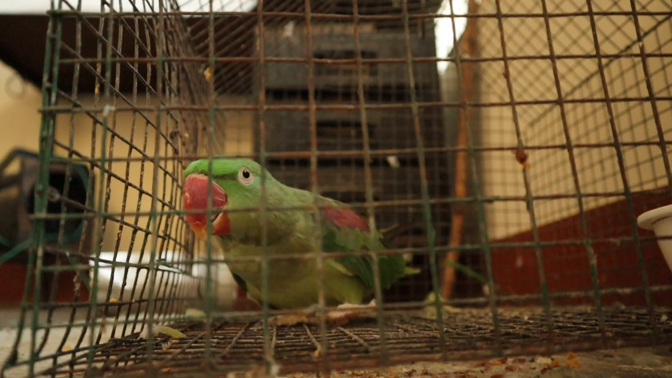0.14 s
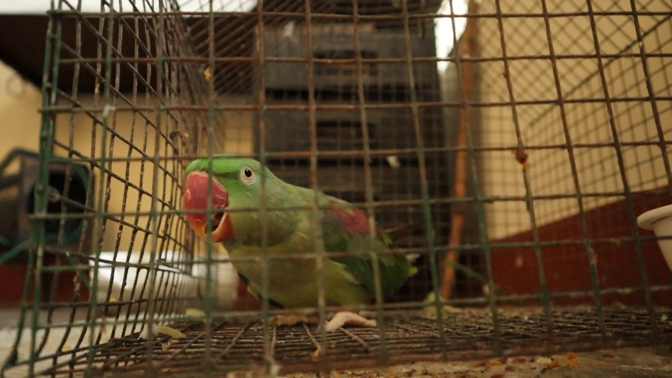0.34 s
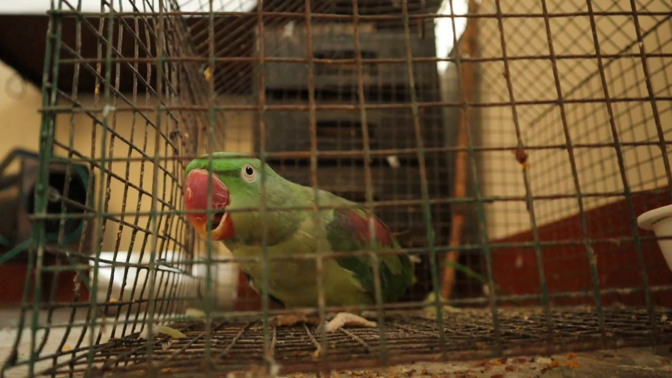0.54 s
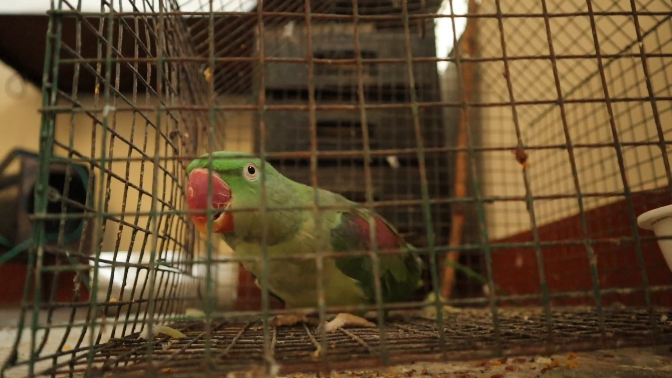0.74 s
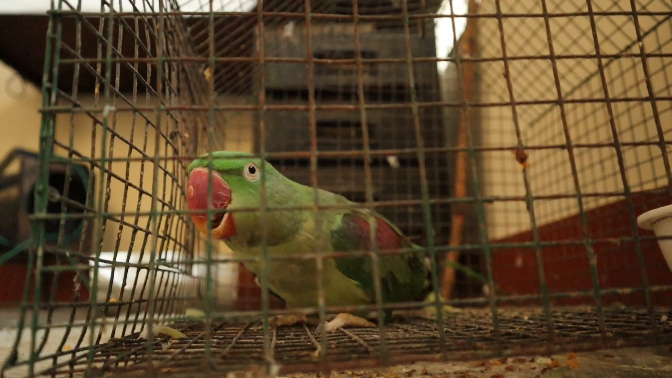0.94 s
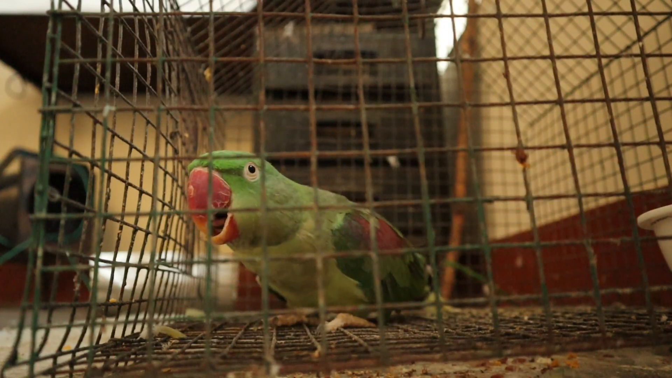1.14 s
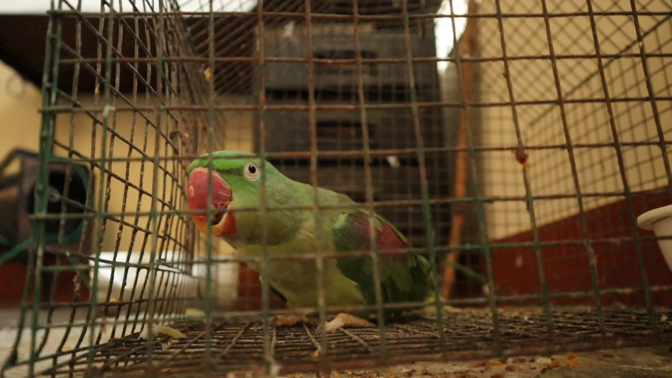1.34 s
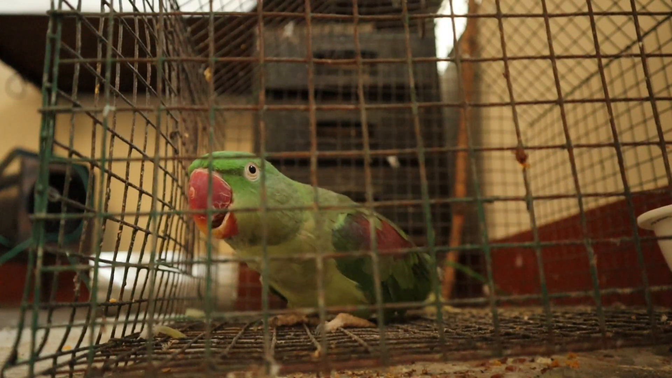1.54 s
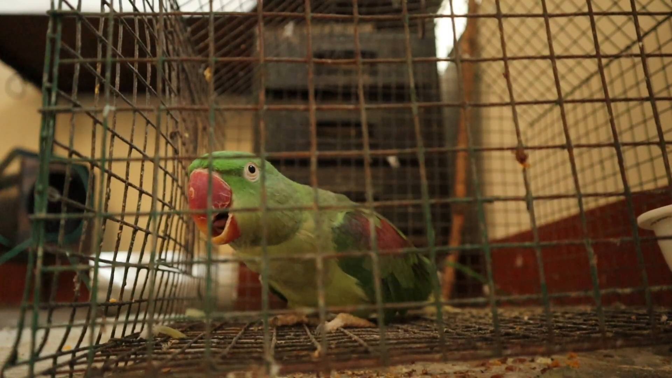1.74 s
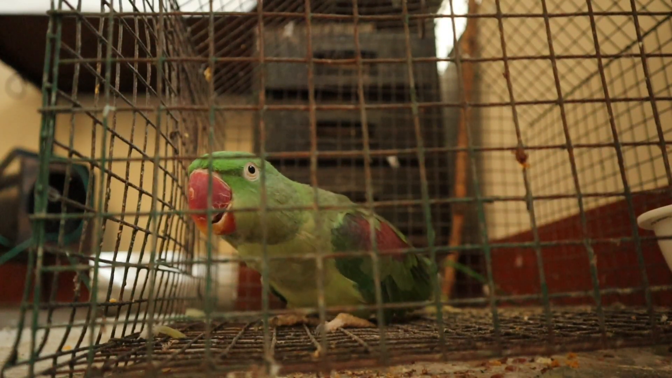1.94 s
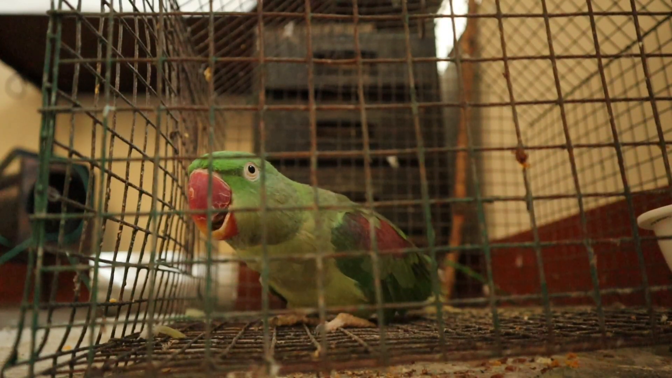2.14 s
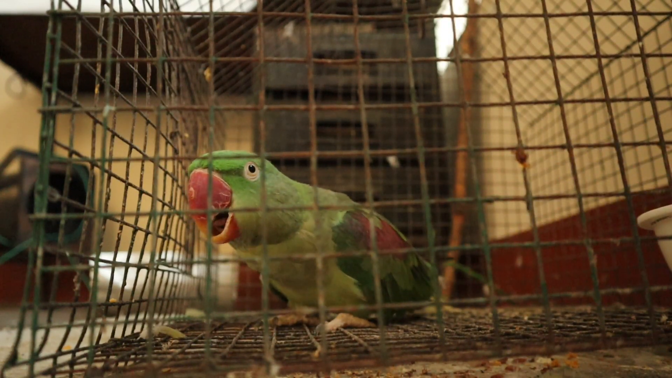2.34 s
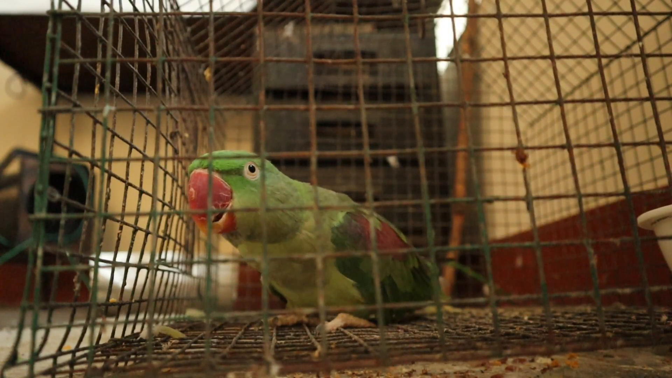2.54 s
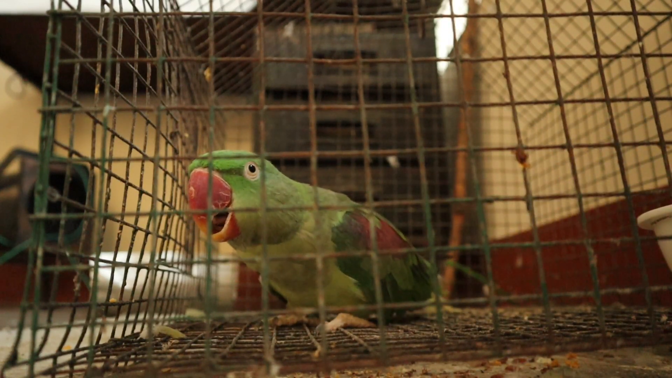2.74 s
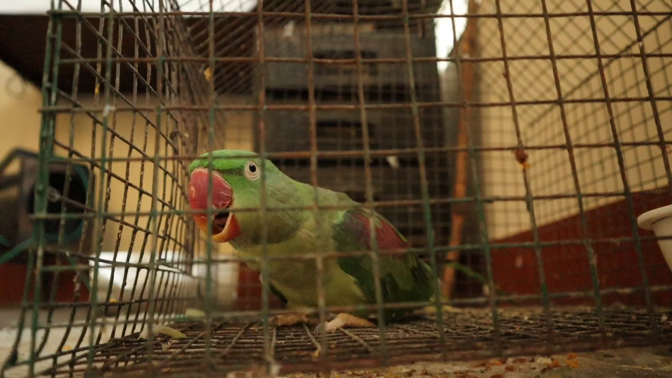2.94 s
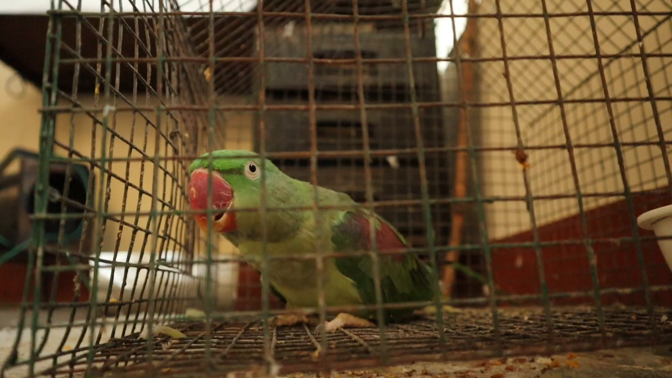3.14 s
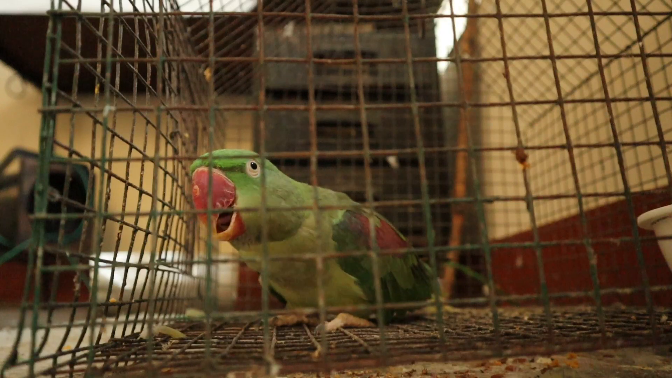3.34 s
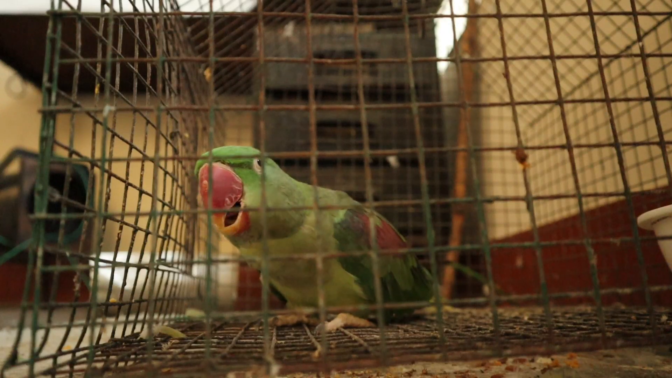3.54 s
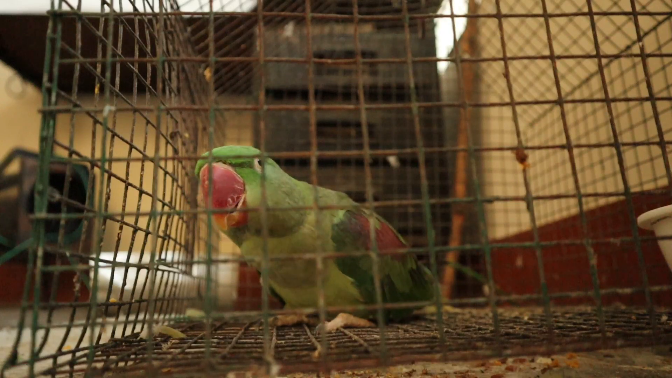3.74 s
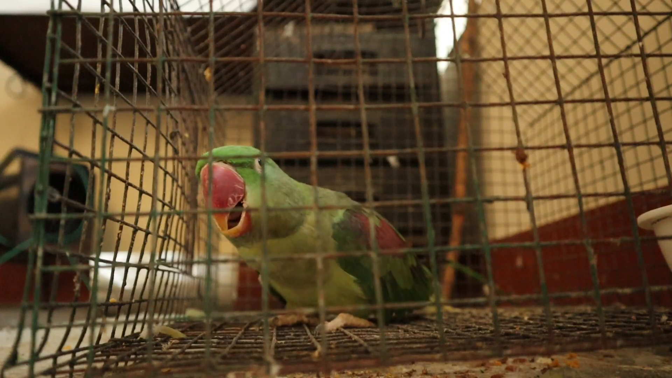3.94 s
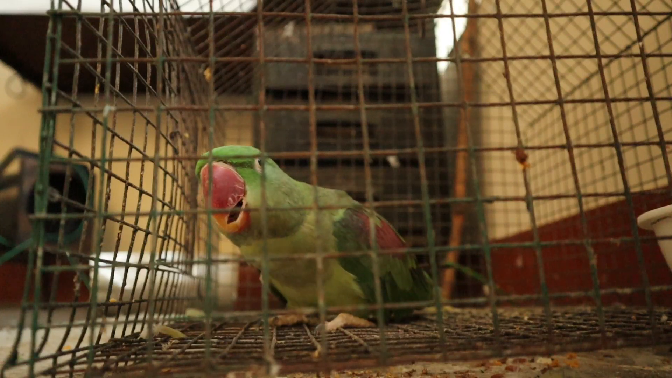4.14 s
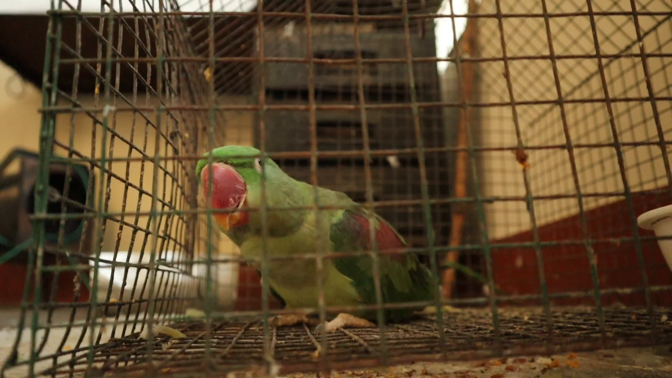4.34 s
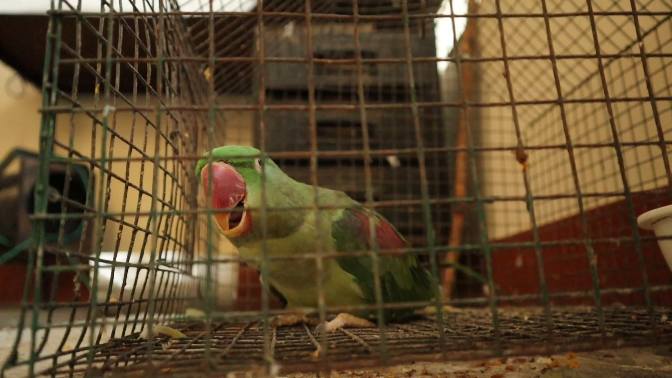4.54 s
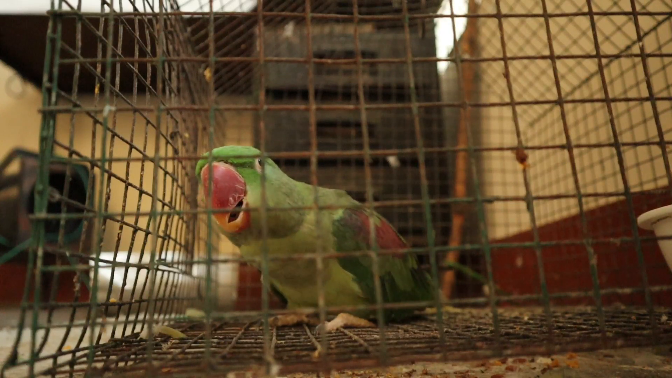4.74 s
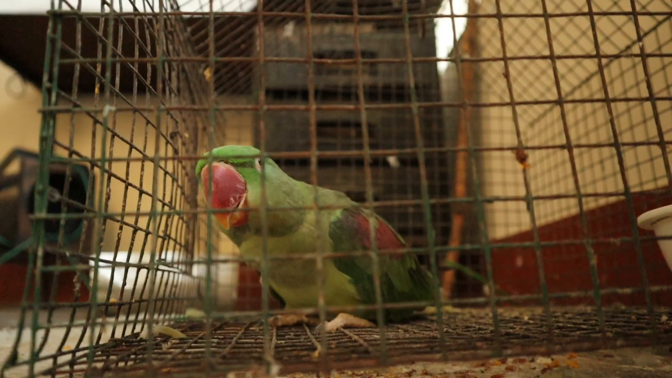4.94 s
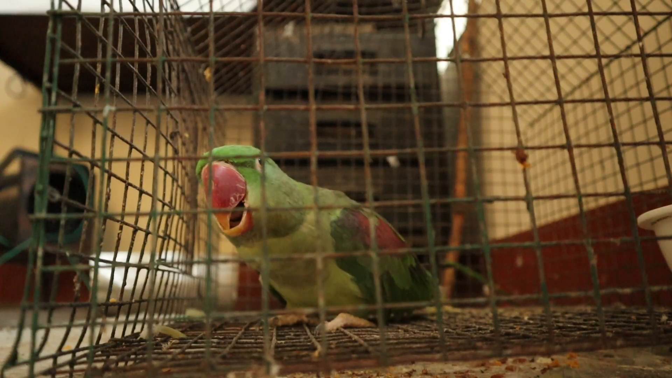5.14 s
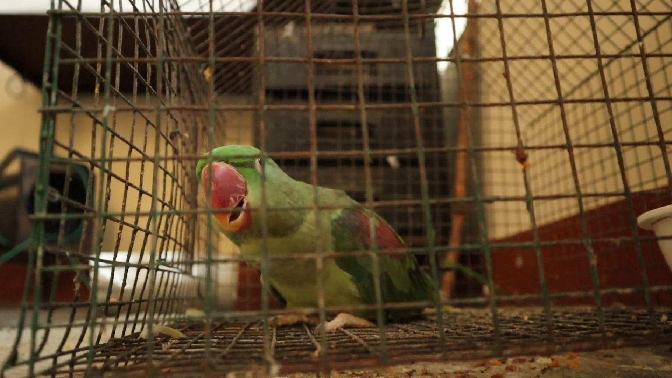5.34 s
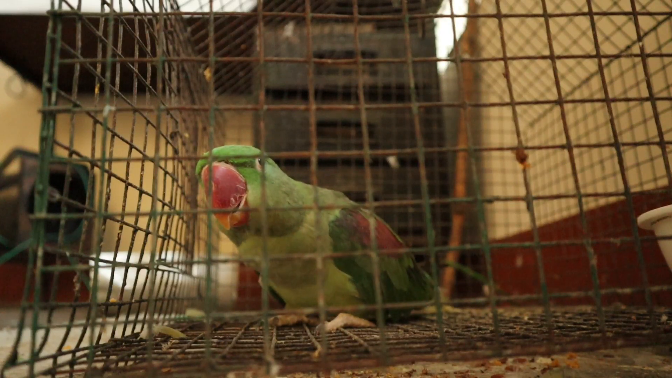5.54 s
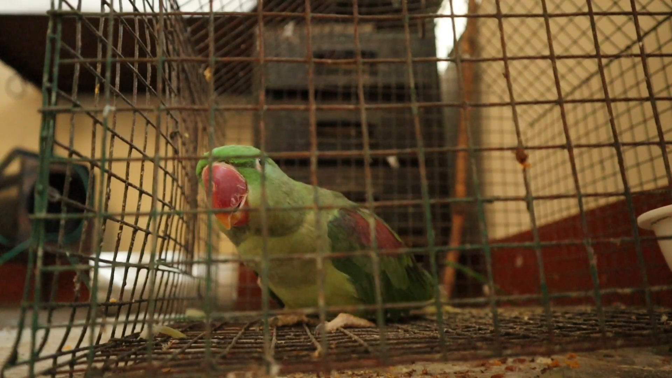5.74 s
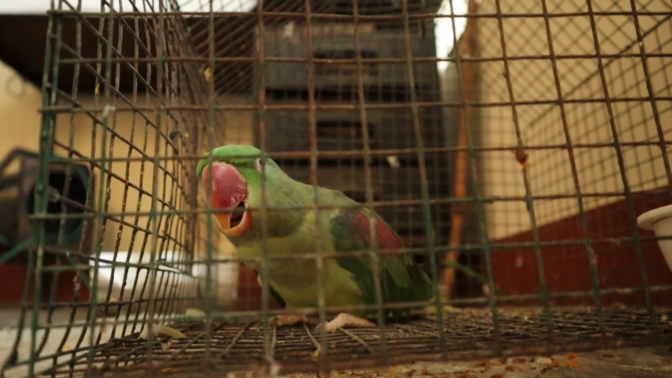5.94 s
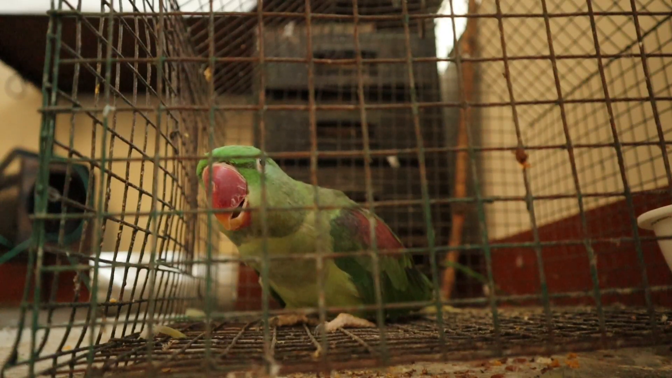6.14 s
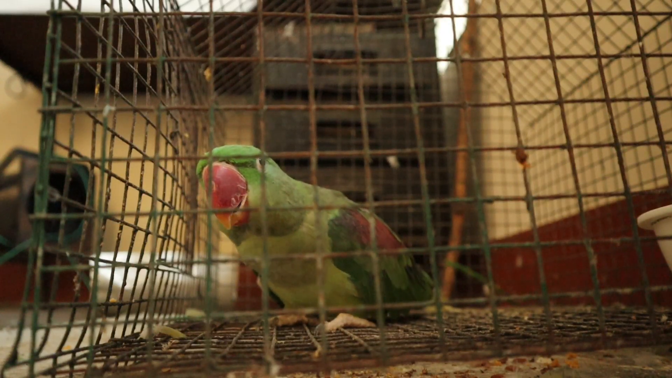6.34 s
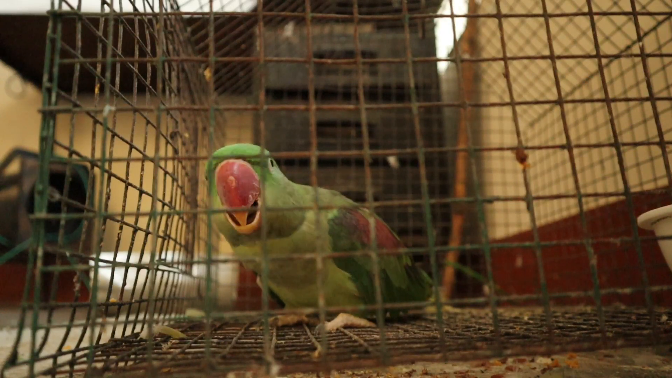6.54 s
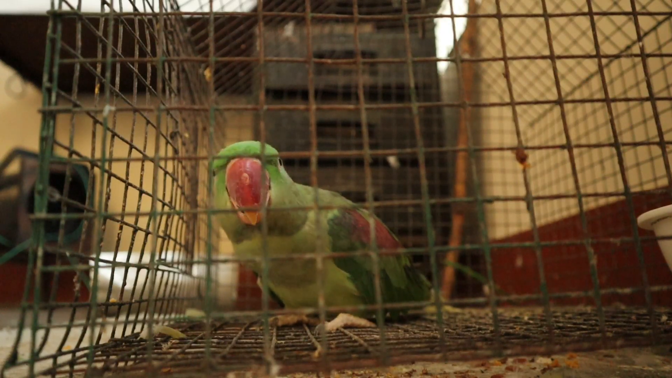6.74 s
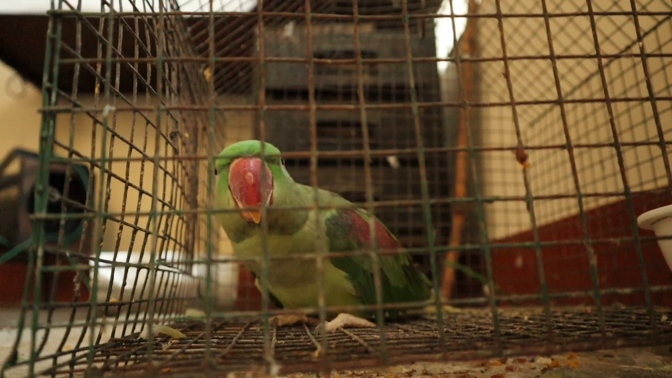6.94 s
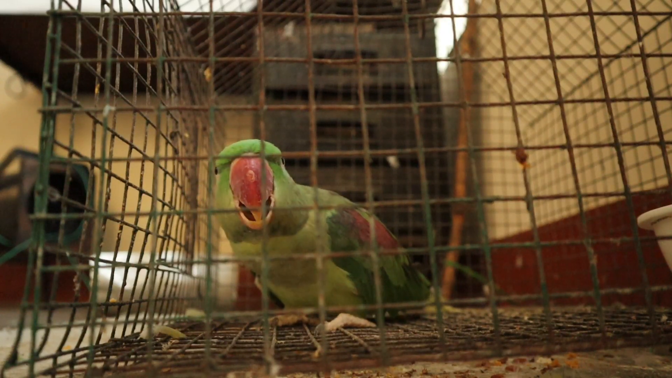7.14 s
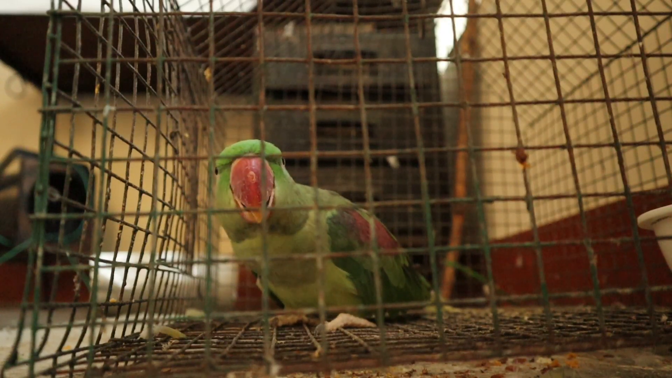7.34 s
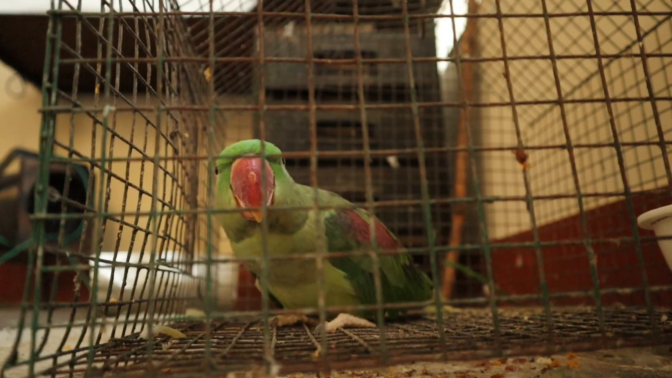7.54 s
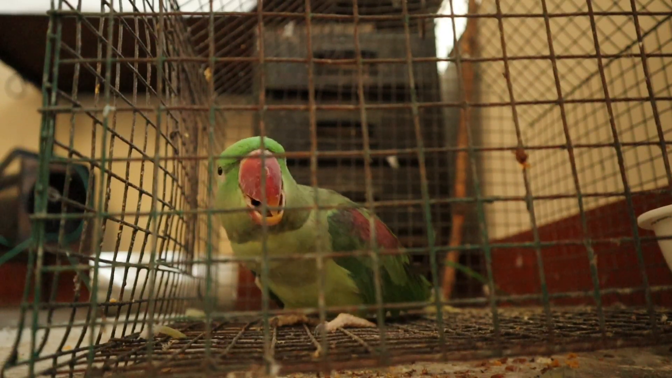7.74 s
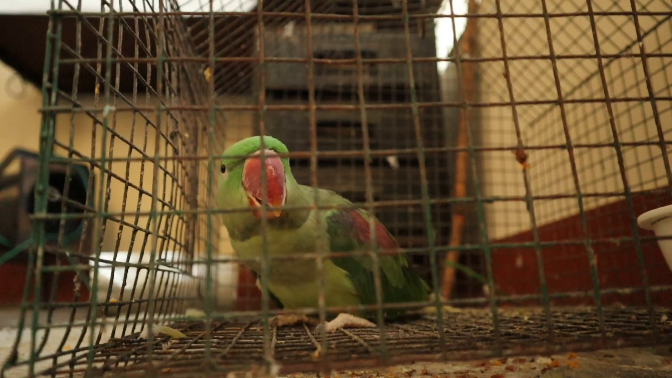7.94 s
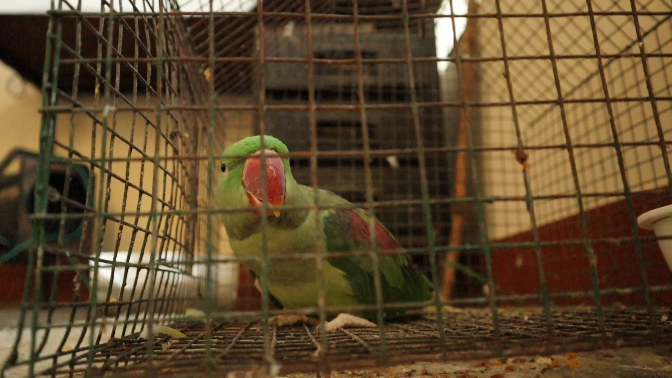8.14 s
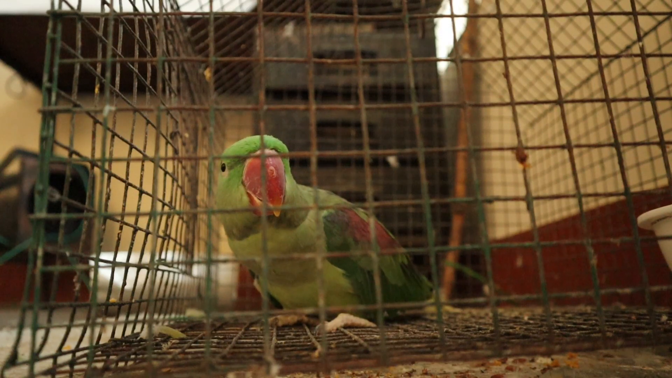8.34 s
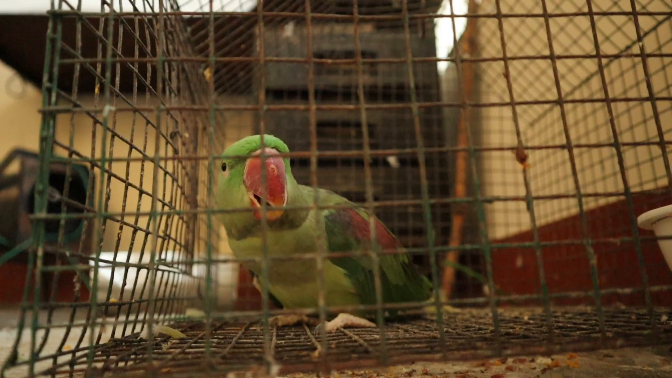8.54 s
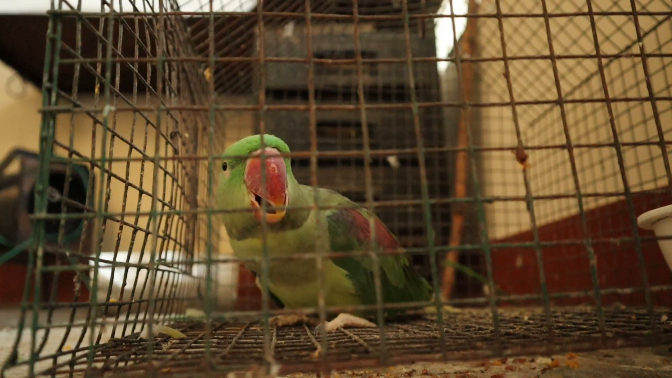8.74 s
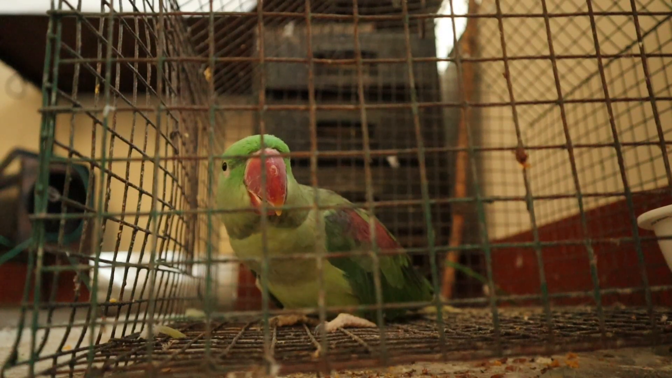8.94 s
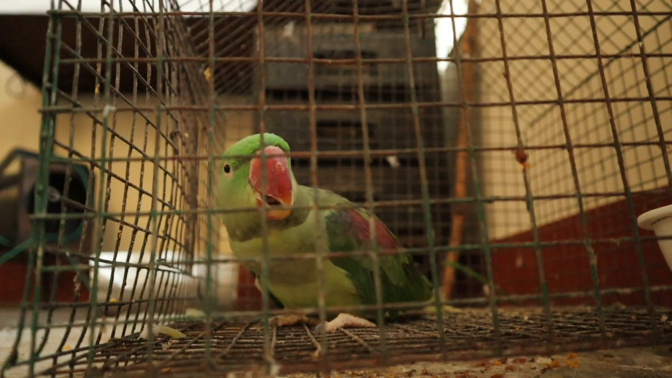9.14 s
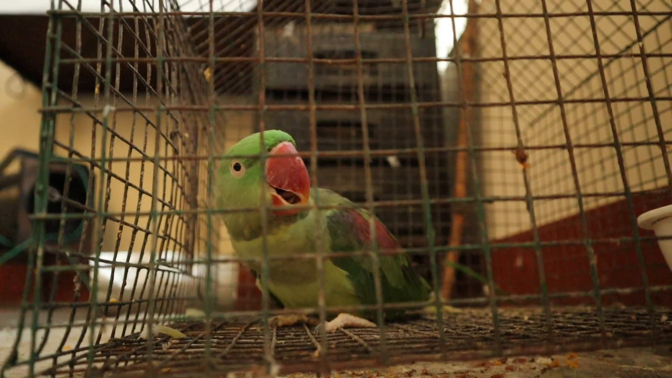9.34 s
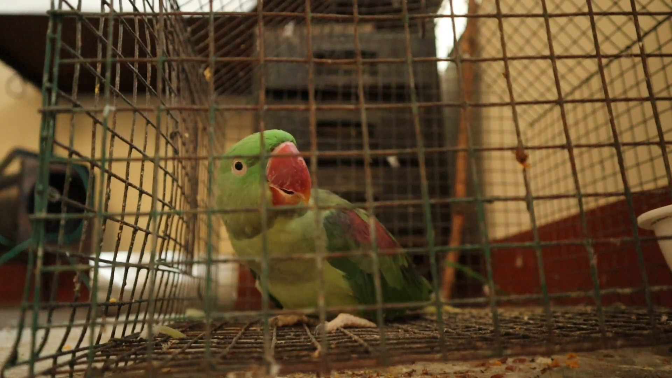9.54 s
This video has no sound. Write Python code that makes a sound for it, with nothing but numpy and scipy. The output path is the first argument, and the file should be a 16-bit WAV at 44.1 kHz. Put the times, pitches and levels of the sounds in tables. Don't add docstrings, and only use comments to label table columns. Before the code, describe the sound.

For the first 0.35 seconds there is only low, far rumble of traffic and air, noticeably loud. A parrot very close then whistles: from 0.4 to 0.8 seconds a thin, hissy note flicks upward four times and holds; from 1.05 to 1.45 a louder, clearer whistle wavers up and down and flips upward at the end. At 1.65 the calls begin: loud, nasal, bright and rich in overtones, each about a third of a second. Each swoops up quickly, catches in a tiny hiccup, arches around a high pitch, then drops abruptly. Thirteen follow about every 0.6 seconds, with longer pauses before those at 5.9 and 8.6; the last starts at 9.2. Hard walls give quick slaps and a half-second ring. Early on, automatic level ducks under each sound and rumble and echoes swell between; after four seconds the background stays low and steady.

```python
import sys
import numpy as np
from scipy import signal
from scipy.fft import rfft, irfft, next_fast_len
from scipy.io import wavfile
from scipy.ndimage import uniform_filter1d, minimum_filter1d, map_coordinates

SR = 44100
rng = np.random.default_rng(int(sys.argv[2]) if len(sys.argv) > 2 else 0)


def store_pcm(level_fs):
    pcm = np.round(np.clip(level_fs, -1, 1) * 32767).astype(np.int16)
    wavfile.write(sys.argv[1], SR, np.atleast_2d(pcm).T)


def boost(x):
    u = np.asarray(x, float) / 20
    return 10 ** u


N = 426888
TIME = np.arange(N) / SR

# (frequency [Hz], level per hertz [dB])
RUMBLE_COLOUR = [(15, -32), (25, -3.5), (163, 0), (196, -4.5), (318, -10.5), (1910, -23), (2180, -24),
                 (4260, -26.5), (6540, -29.5), (11500, -44.5), (15000, -83.5)]
# (frequency [Hz], likeness [-1 to 1])
RUMBLE_LIKENESS = [(60, 0.985), (180, 0.97), (540, 0.23), (1640, 0.98), (4950, -0.66), (14900, -1)]
# (start [s], end [s], frequency [Hz], level [dB])
DRONES = [
    (0.056, 0.496, 196.6, -68),
    (7.92, 8.806, 156, -69.5),
    (9.103, 9.25, 445, -58.5),
]

# (time [s], pitch [Hz], effort [dB])
OPENING = [
    (.36, 552, -48.5),
    (.384, 765, -36.5),
    (.422, 1074, -40.5),
]
# (time of top [s], top pitch [Hz], pitch of the dip before [Hz], effort [dB])
FLICKS = [
    (0.476, 1235, 892, -19),
    (0.533, 1282, 924, -17),
    (0.595, 1319, 1000, -16.5),
    (.659, 1333, 1082, -17),
]
FLICK_S, DIP_DB = .02, -1
# (time [s], pitch [Hz], effort [dB])
HOLDING = [
    (.67, 1286, -17),
    (0.763, 1301, -21),
    (0.776, 1295, -62.5),
]
# (time [s], pitch [Hz], effort [dB])
SECOND_WHISTLE = [
    (1.052, 922, -36),
    (1.078, 1022, -15),
    (1.113, 1383, -11),
    (1.161, 1168, -9),
    (1.195, 1515, -10),
    (1.253, 1247, -11.5),
    (1.312, 1353, -10.5),
    (1.421, 1350, -13),
    (1.439, 1623, -26.5),
]
CUSPS = [2.2, 4.5]

# (start [s], swoop length [s], start to drop [s], arch top pitch [Hz])
CALLS = [(1.662, .087, .324, 1397), (2.247, .091, .316, 1394), (2.818, .092, .312, 1383),
         (3.388, .094, .312, 1373), (3.96, .096, .314, 1377), (4.553, .096, .319, 1367),
         (5.148, .096, .314, 1357), (5.925, .095, .31, 1360), (6.528, .094, .3, 1360),
         (7.13, .094, .3, 1351), (7.722, .094, .304, 1351), (8.632, .09, .298, 1352),
         (9.218, .09, .293, 1354)]
CALL_EFFORT = [1.64, 1.85, 1.9, 1.8, 1.1, 0.9, 0.87, 0.9, 0.53, 0.4, -0.9, -1.5, -1.5]
# (share of swoop time [0 to 1], share of top pitch [0 to 1], effort [dB])
SWOOP = [
    (-.03, .31, -44),
    (.2, 0.49, -27.5),
    (.52, .725, -16.5),
    (.7, .8, -13),
    (1, 0.98, -11),
]
SWOOP_CHANGE_DB_PER_S, MIDWAY_S = 0.04, 6.3
HICCUP_S, HICCUP_HZ, HICCUP_DB = .034, 1191.6, -11
CREST, SAG, ROUND = .55, .125, 2.2
ARCH_DB, TIRE_DB, TIRE_LATE = -11.5, -6, 2.12
# (time after the arch [s], pitch [Hz], effort [dB])
DROP = [
    (.012, 865, -33),
    (0.021, 613, -41.5),
    (.028, 480, -59.5),
]

OVERTONES = [-1, 5, 1, 0, -3, -14, -12, -15, -18, -12.5, -35, -14.5, -13.5, -16]
# (frequency [Hz], level [dB])
THROAT = [(500, 5.5), (1200, -7), (1900, 6), (2700, 5), (3250, -7.5), (4100, -5.5), (4700, -6.5),
          (5600, -18), (6700, -4.5), (7400, -4.5), (8200, -4), (10600, -8.5), (12000, -35), (13600, -24.5)]
# (time [s], treble slope [dB per octave])
FACING = [(.4, -1.5), (1.1, -0.7), (1.7, 1.3), (2.4, 1), (3.4, 1.2), (6, 1.05), (7.7, 1.8), (9.2, 1.4)]
# (frequency [Hz], share of the lift [no unit])
GAPE = [(2800, -0.58), (3600, 0.83), (8500, 0.25), (9800, -3)]
FIRST_GAPE_DB, GAPE_DB = 6, 0
HOARSE_DB, HOARSE_HZ = -28.5, (3994, 9130)
RASP_DB = 0.64
SHAKE = .04

# (left [ms], left gain [x], right [ms], right gain [x])
NEAR_PATHS = [(0.0, 0.964, 0.035, 0.556), (0.345, -0.39, 0.15, 0.613), (0.158, -0.842, 0.213, -1.206),
              (1.467, -0.186, 1.452, 0.357), (1.644, 0.235, 1.62, -0.492), (0.905, -0.209, 0.433, -0.318),
              (0.767, 0.316, 0.572, 0.277)]
# (delay [s], level [dB])
WALL_ECHOES = [(.006, -13), (.011, -23), (.019, -20.5), (.028, -19.5), (.041, -26)]
# (frequency [Hz], likeness [-1 to 1])
YARD_LIKENESS = [(200, .9), (600, .3), (1300, -.45), (2600, -0.28), (7000, -0.54)]
# (frequency [Hz], time to fall 60 dB [s])
YARD_DECAY = [(500, 0.68), (1300, 0.54), (2600, 0.61), (4000, 0.63), (9000, 0.43)]

# (time [s], gain [dB])
RESTING_GAIN = [(0, 26.5), (.9, 22.5), (1.55, 16), (2.15, 11.5), (2.75, 7.5), (3.3, 5.5), (4, 2.5),
                (4.12, -2), (4.4, -2.4), (7.4, -1.5), (8.5, 1.7), (8.8, 1.5), (9.68, 1)]
# (lag [s], fall time [s], ducked gain [dB])
WHISTLE_DUCKS = [
    (.07, 0.065, 4.5),
    (.001, .09, -1.54),
]
CALL_DUCK, RECOVER_S = (0.03, 0.081, -2.1), .09


def unit(x):
    return x / np.sqrt(np.mean(x ** 2) + 1e-20)


def along(points, hz):
    f, v = np.transpose(points)
    return np.interp(np.log(hz + 1), np.log(f + 1), v)


def glide(s, v, t):
    step = np.diff(v) / np.diff(s)
    before, after = np.r_[step[0], step], np.r_[step, step[-1]]
    product = before * after
    slope = np.where(product > 0, 2 * product / (before + after + 1e-40), 0)
    i = np.clip(np.searchsorted(s, t) - 1, 0, len(s) - 2)
    h = s[i + 1] - s[i]
    u = (t - s[i]) / h
    bend = (1 - u) * (slope[i] - step[i]) - u * (slope[i + 1] - step[i])
    return v[i] + h * u * (step[i] + (1 - u) * bend)


def wobble(rate):
    return map_coordinates(rng.standard_normal(int(N * rate / SR) + 4), [TIME * rate])


def filtered(x, response):
    m = next_fast_len(N + SR // 2)
    return irfft(rfft(x, m) * response(np.fft.rfftfreq(m, 1 / SR)), m)[..., :N]


def paired(alike, colour):
    def turn(hz):
        return np.arccos(np.clip(along(alike, hz), -1, 1)) / 2

    noise = rng.standard_normal((2, N))
    mid, side = filtered(noise, lambda hz: colour(hz) * [np.cos(turn(hz)), np.sin(turn(hz))])
    return unit(np.array([mid + side, mid - side]))


def background():
    rumble = paired(RUMBLE_LIKENESS, lambda hz: boost(along(RUMBLE_COLOUR, hz)))
    sound = boost(-68 + 2.4 * wobble(5.5)) * rumble
    sway = np.cumsum(1 + 0.011 * wobble(25)) / SR + np.c_[[.0001, -.0001]]
    for start, end, hz, db in DRONES:
        fade = np.clip(np.minimum(TIME - start, end - TIME) / 0.012, 0, 1)
        sound = sound + fade * boost(db + 1.5 * wobble(10)) * np.sin(2 * np.pi * hz * sway)
    return sound


def whistles():
    flicks = []
    for s, top, dip, db in FLICKS:
        flicks += [(s - FLICK_S, dip, db + DIP_DB), (s, top, db)]
    return [OPENING + flicks + HOLDING, SECOND_WHISTLE]


def calls():
    u = np.arange(1, 9) / 8
    from_crest = abs((u - CREST) / np.where(u < CREST, CREST, 1 - CREST))
    bow = 1 - SAG * from_crest ** ROUND
    sung = []
    for (start, swoop, length, top), db in zip(CALLS, CALL_EFFORT):
        change = SWOOP_CHANGE_DB_PER_S * (start - MIDWAY_S)
        catch = swoop + HICCUP_S
        shape = [(share * swoop, ratio * top, d + share * change) for share, ratio, d in SWOOP]
        shape += [(catch, HICCUP_HZ, HICCUP_DB)]
        shape += list(zip(catch + u * (length - catch), top * bow, ARCH_DB + TIRE_DB * u ** TIRE_LATE))
        shape += [(length + s, hz, d) for s, hz, d in DROP]
        sung.append(np.add(shape, [start, 0, db]))
    return sung


def parrot():
    voice = np.zeros(N)
    order = np.arange(1, len(OVERTONES) + 1)[:, None]
    jitter, flutter = .0022 * wobble(120), wobble(45)
    air = unit(filtered(rng.standard_normal(N), lambda hz: boost(along(THROAT, hz))))
    low, high = HOARSE_HZ
    hiss = unit(filtered(air, lambda hz: 1 / (1 + (low / (hz + 1)) ** 10) / (1 + (hz / high) ** 20)))
    for nth, rows in enumerate(whistles() + calls()):
        s, hz, db = np.transpose(rows)
        now = slice(int(s[0] * SR) + 1, int(s[-1] * SR))
        t = TIME[now]
        facing = np.interp(s[0], *np.transpose(FACING))
        gape = GAPE_DB if nth else FIRST_GAPE_DB

        power = 1 if nth > 1 else -CUSPS[nth]
        pitch = glide(s, hz ** power, t) ** (1 / power)
        octaves_per_s = abs(np.gradient(np.log2(pitch))) * SR
        haste = np.clip(uniform_filter1d(octaves_per_s, size=400), 0, 20)
        pitch = pitch * (1 + jitter[now] * (1 + SHAKE * haste))
        phase = 2 * np.pi * np.cumsum(pitch) / SR

        slack = np.clip(np.log2(1250 / pitch), 0, 2)
        slope = (facing - 1.7 * slack) * np.log2(order) - 8.4 * slack * np.clip(order - 8, 0, 8)
        throat = along(THROAT, order * pitch) + gape * along(GAPE, order * pitch)
        size = boost(np.c_[OVERTONES] + slope + throat)
        size = size / np.sqrt(np.sum(size ** 2, axis=0) / 2)
        uneven = np.array([np.roll(flutter, 9000 * k)[now] for k in range(len(OVERTONES))])
        size = size * boost(.45 * (order - 1.2) * uneven)
        tone = np.sum(size * np.cos(order * phase), axis=0)

        puffs = 1 + np.cos(phase)
        breath = boost(-56 + 1.5 * gape + 6.2 * slack + RASP_DB * haste) * air[now] * puffs
        if nth == 0:
            breath = breath + boost(HOARSE_DB) * np.clip(haste / 5, .3, 1) * hiss[now] * puffs

        edge = np.clip(np.minimum(t - s[0], s[-1] - t) / 0.0074, 0, 1)
        effort = edge * boost(np.interp(t, s, db))
        voice[now] = effort * (tone + breath)
    return voice


def near_paths(hz):
    ways = 0
    for left, left_gain, right, right_gain in NEAR_PATHS:
        delay_s = np.c_[[left, right]] / 1000
        ways = ways + np.c_[[left_gain, right_gain]] * np.exp(-2j * np.pi * hz * delay_s)
    long_waves = 1 / (1 + (hz / 560) ** 8)
    ways = ways + long_waves * (ways[::-1] - ways) / 2
    return ways / np.sqrt(np.mean(abs(ways) ** 2, axis=0))


def wall_echoes(hz):
    sides = rng.uniform(-.0003, 0.0002, (len(WALL_ECHOES), 2))
    echoes = 0
    for (s, db), side in zip(WALL_ECHOES, sides):
        echoes = echoes + boost(db) * np.exp(-2j * np.pi * hz * (s + np.c_[side]))
    return echoes


def yard(x):
    noise = paired(YARD_LIKENESS, np.ones_like)[:, :SR]
    hz, t, z = signal.stft(noise, SR, nperseg=256)
    decay = boost(-60 * t / along(YARD_DECAY, hz)[:, None])
    tail = signal.istft(z * decay, SR, nperseg=256)[1]
    tail = tail / np.linalg.norm(tail[0])
    late = np.pad(x, (400, 0))[None]
    return signal.fftconvolve(late, tail, axes=1)[:, :N]


def gain_db():
    gain = np.interp(TIME, *np.transpose(RESTING_GAIN))
    ducks = WHISTLE_DUCKS + [CALL_DUCK] * 4
    for rows, (lag, fall, ducked_db) in zip(whistles() + calls(), ducks):
        start, end = rows[0][0] + lag, rows[-1][0] - .015
        duck = np.clip(np.minimum((TIME - start) / fall, 1 - (TIME - end) / RECOVER_S), 0, 1)
        gain = gain + duck * (ducked_db - gain)
    return gain


def scene():
    voice = parrot()
    bird = filtered(voice, near_paths)
    echoes = filtered(voice, wall_echoes) + boost(-14.5) * yard(voice)
    return background() + bird + echoes


def roll_off(x):
    return signal.sosfilt(signal.butter(12, 15510, fs=SR, output="sos"), x)


def record(dry):
    loud = dry * boost(gain_db())
    needed = np.minimum(1, .92 / (abs(loud).max(axis=0) + 1e-9))
    loud = loud * uniform_filter1d(minimum_filter1d(needed, size=200), size=200)
    return roll_off(loud)


dry = scene()
out = record(dry)
store_pcm(out)
```